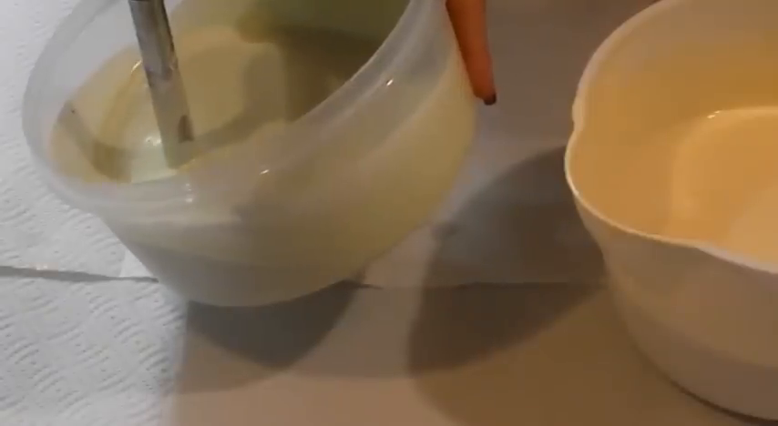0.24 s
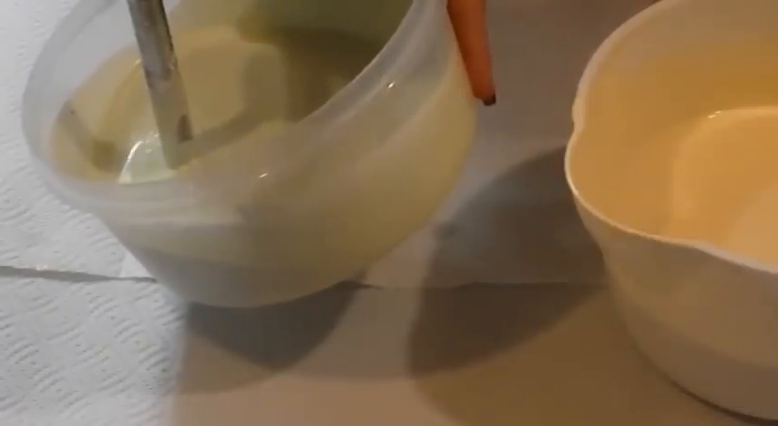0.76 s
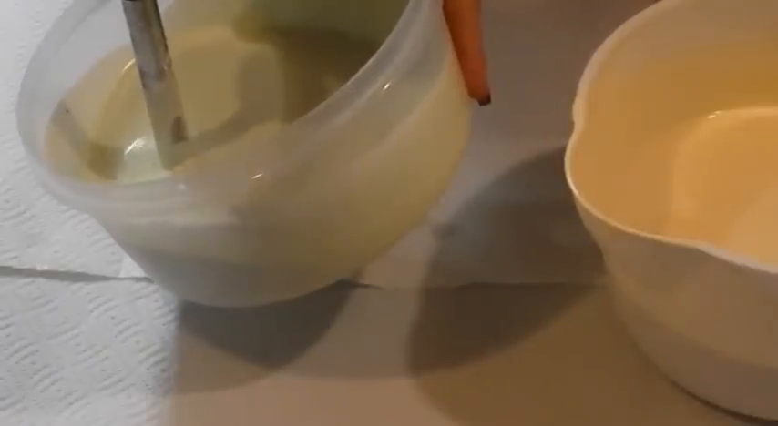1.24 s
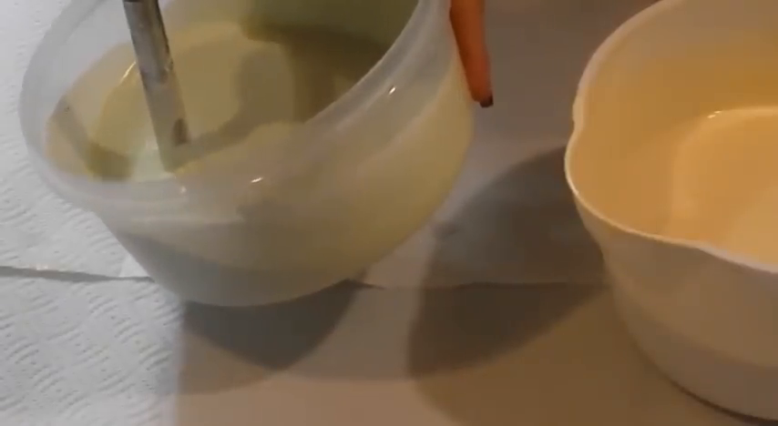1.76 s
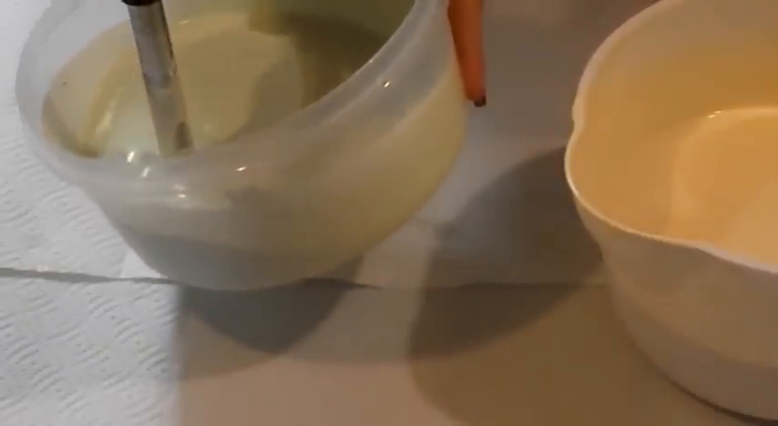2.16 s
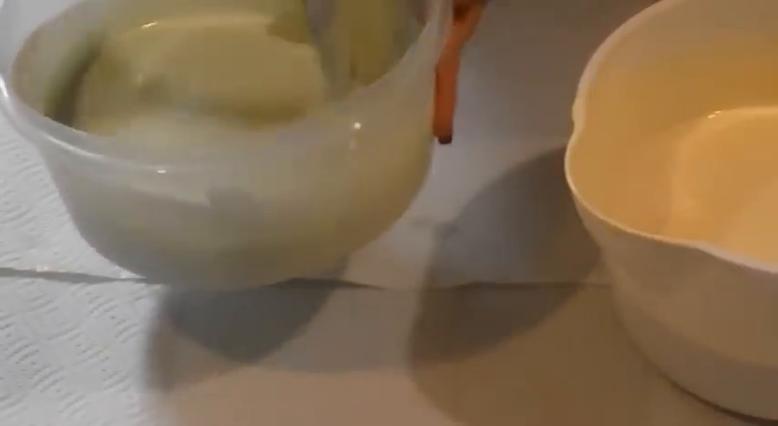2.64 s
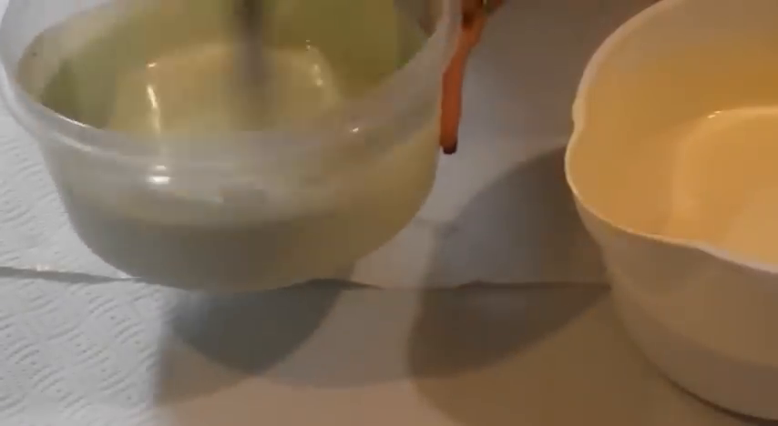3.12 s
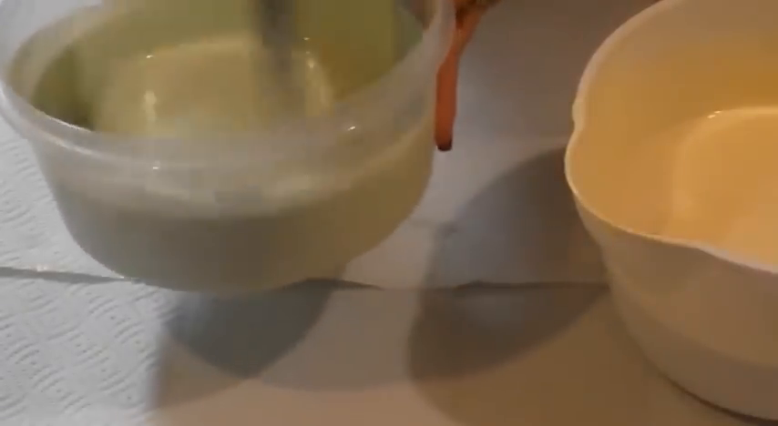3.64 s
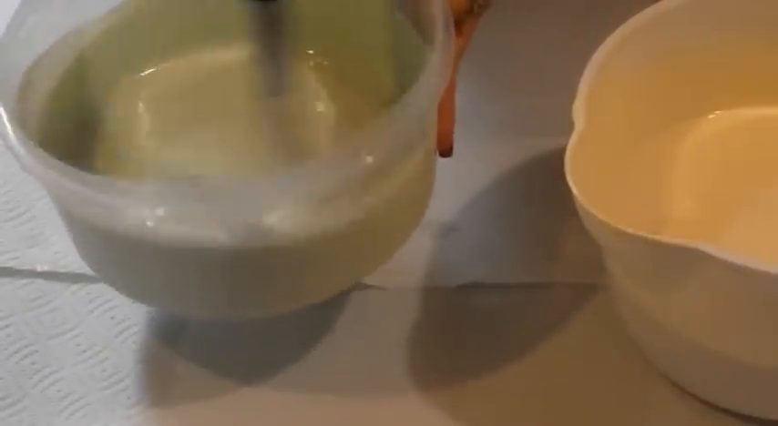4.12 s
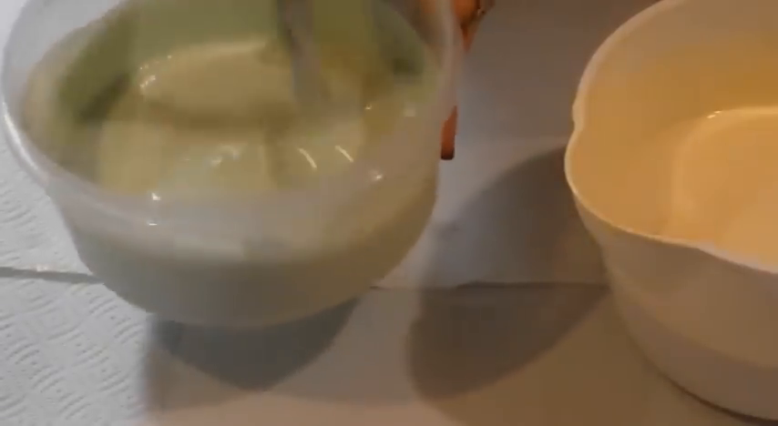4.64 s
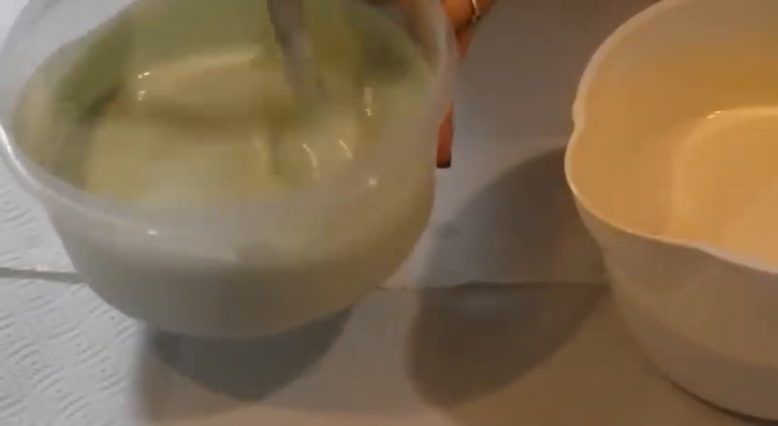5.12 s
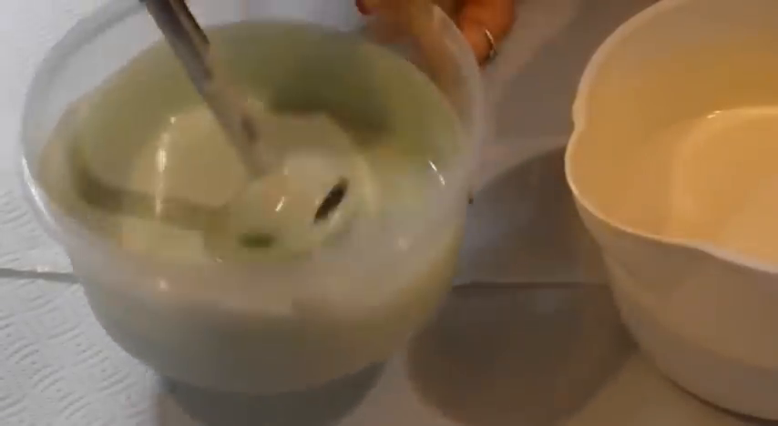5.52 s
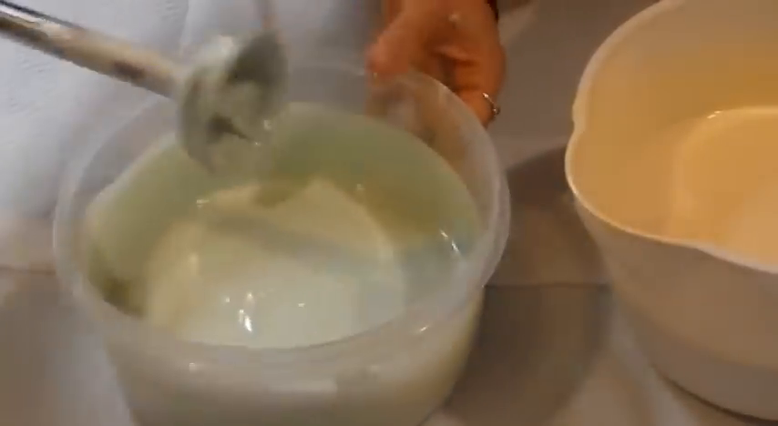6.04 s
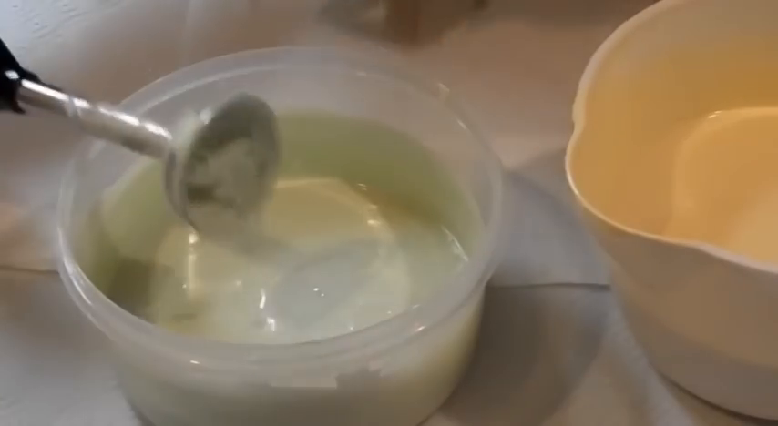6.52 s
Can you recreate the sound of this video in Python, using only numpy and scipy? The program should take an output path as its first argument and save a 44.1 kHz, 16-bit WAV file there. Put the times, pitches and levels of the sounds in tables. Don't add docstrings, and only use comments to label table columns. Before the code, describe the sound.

Close up in a small quiet kitchen, a hand blender runs in a plastic tub of thick batter with a steady, rattling motor hum and thin high whine. At about two seconds it switches off, quickly falling in pitch with loose clacks. The idle shaft taps the tub now and then, the tub is set down with a soft thump, and two solid knocks land on the rim.

```python
import sys
import numpy as np
from scipy import signal
from scipy.fft import rfft, irfft
from scipy.io import wavfile

SR = 44100
rng = np.random.default_rng(int(sys.argv[2]) if len(sys.argv) > 2 else 0)


def wav_record(signal):
    frames = np.transpose(np.atleast_2d(signal))
    bounded = np.clip(frames, -1, 1)
    quanta = np.round(bounded * 32767).astype(np.int16)
    wavfile.write(sys.argv[1], SR, quanta)


def how_loud(loudness_db):
    steps = np.asarray(loudness_db, float) / 20
    return 10 ** steps


N = 299290

MAINS_HZ = 60
BARS = 24
# (t/s, turns per second/Hz, levels of orders 1, 2, 3, 4/dB)
ROTOR_TRACK = [(0.0, 182, -26.5, -16.5, -20, -11.5), (0.016, 188, -28, -16, -18, -21),
               (0.06, 186.3, -27.5, -17.5, -21.5, -13.5), (0.572, 187, -25, -17.5, -26.5, -16),
               (0.622, 188, -26, -17, -24, -15.5), (0.716, 182, -23, -16, -29, -17.5),
               (0.728, 189, -26, -17.5, -25, -15.5), (0.854, 185, -25.5, -17, -29.5, -17.5),
               (0.87, 186, -27.5, -17, -20.5, -17), (1.118, 187, -24, -17, -34.5, -17),
               (1.278, 187, -25.5, -18, -26, -19), (1.478, 187, -26, -16.5, -31, -16),
               (1.51, 187, -25.5, -15, -39, -18.5), (1.62, 187, -28, -18, -23, -17.5),
               (1.648, 185.6, -27, -16, -24, -15.5), (1.792, 189, -28.5, -20, -29, -18.5),
               (1.846, 185.6, -26, -27, -33, -20), (1.858, 185.6, -28, -24, -55, -22),
               (1.874, 181, -28.5, -27, -27, -18), (1.902, 191, -25.5, -22, -39, -20.5),
               (1.918, 172, -34, -54, -49, -19.5), (1.934, 187, -27, -34, -28.5, -20),
               (1.98, 185.6, -26, -20, -31, -21.5)]


def rms_one(x):
    return x / np.sqrt(np.mean(x ** 2) + 1e-20)


def in_time(rows, end_db=-120):
    s, *columns = np.transpose(rows)
    t = np.arange(N) / SR
    return [np.interp(t, np.r_[s, s[-1] + .05], np.r_[c, end_db]) for c in columns]


def at_hz(points, hz):
    point_hz, point_db = np.transpose(points)
    return np.interp(np.log(hz), np.log(point_hz), point_db)


def drift(rate_hz):
    r = np.exp(-80 * np.pi * rate_hz / SR)
    slow = signal.lfilter([1], [1, -2 * r, r * r], rng.standard_normal(N // 40 + 2002))[2000:]
    return np.interp(np.arange(N) / 40, np.arange(len(slow)), rms_one(slow - slow.mean()))


def ring(drive, hz, t60):
    r, w = how_loud(-60 / (t60 * SR)), 2 * np.pi * hz / SR
    return signal.lfilter([0, np.sin(w)], [1, -2 * r * np.cos(w), r * r], drive + 1e-18)


def band(x, low_hz, high_hz, order=2):
    edges_hz = [low_hz, min(high_hz, .45 * SR)]
    return signal.sosfilt(signal.butter(order, edges_hz, "band", fs=SR, output="sos"), x)


def coloured(spectrum):
    hz = np.maximum(np.fft.rfftfreq(N, 1 / SR), 1)
    return rms_one(irfft(rfft(rng.standard_normal(N)) * how_loud(at_hz(spectrum, hz)), N))


def clicks_at(times, sizes):
    out = np.zeros(N)
    out[np.round(np.array(times) * SR).astype(int)] = sizes
    return out


def room_tone():
    # (f/Hz, level/dB)
    floor_spectrum = [(8.8, -34.5), (15, 5), (26, 1.5), (38, -22), (103, -32), (134, -42.5), (312, -39),
                      (497, -51), (543, -43), (1460, -44), (3220, -49.5), (4310, -47.5), (16000, -51)]
    # (t/s, level/dB)
    air_levels = [(0.0, -54), (0.32, -57), (0.56, -45.5), (1.04, -60.5), (1.42, -43), (1.66, -50.5),
                  (2.06, -63), (2.46, -64.5), (2.72, -61.5), (3.23, -58.5), (4.16, -58.5), (4.37, -53.5),
                  (4.74, -61), (5.07, -54), (5.48, -60.5), (5.74, -60.5), (5.95, -55), (6.03, -49),
                  (6.18, -51), (6.39, -59.5), (6.46, -41), (6.62, -33), (6.67, -40), (6.79, -29)]
    lumps = rms_one(band(rng.standard_normal(N), 7.1, 70) * how_loud(4.0 * drift(5)))
    return how_loud(-51) * coloured(floor_spectrum) + how_loud(in_time(air_levels)[0] - 5.5) * lumps


def worktop():
    # (t/s, peak level/dB)
    thumps = [
        (4.401, -41),
        (4.858, -40),
        (5.807, -27.5),
        (5.889, -40),
        (5.978, -37.5),
        (6.047, -35),
        (6.389, -52),
        (6.452, -8.5),
        (6.721, -6.5),
    ]
    # (f/Hz, level/dB, t60/s)
    slab_modes = [(59, 6, 0.24), (47, -14.5, .3), (150, -6, 0.18), (225, -18, .12)]
    s, db = np.transpose(thumps)
    push = signal.lfilter([.03], [1, -.97], clicks_at(s, how_loud(db)))
    return -sum(how_loud(level_db - 7.0) * ring(push, hz, t60) for hz, level_db, t60 in slab_modes)


def ticks():
    # (t/s, peak level/dB, f/Hz, band width/octaves)
    tick_events = [(.149, -25, 4430, .2), (2.886, -57.5, 1400, .6), (3.015, -52, 8770, .3),
                   (3.176, -45, 4880, .2), (3.209, -58.5, 11200, .25), (3.258, -59, 1806, .8),
                   (3.368, -55.5, 1430, .3), (4.345, -47, 3360, .3), (4.668, -51, 7350, .15),
                   (4.767, -39.5, 8600, .2), (4.80, -61, 1367, .3), (4.822, -60, 1360, .3),
                   (5.102, -60.5, 3930, .15), (5.773, -34.5, 8280, .3), (5.917, -41, 6000, .2),
                   (5.917, -50, 3780, .15), (5.917, -46, 8800, .2), (6.356, -37.5, 7550, .15),
                   (6.53, -20, 11100, .8), (6.529, -37, 7000, .15), (6.528, -45, 3860, .15),
                   (6.559, -34, 11400, .5), (6.634, -55, 10000, 1.0), (6.685, -54, 8970, 1.0),
                   (6.703, -40, 8800, 1.0), (6.742, -40, 11000, .6), (6.759, -37, 9900, 1.0),
                   (6.776, -33, 10900, .8)]
    out, t = np.zeros(N), np.arange(int(.08 * SR)) / SR
    for s, db, hz, octaves in tick_events:
        burst = rng.standard_normal(len(t)) * (np.exp(-t / .0012) + .06 * np.exp(-t / .012))
        burst = band(burst, hz * 2 ** (-octaves / 2), hz * 2 ** (octaves / 2), order=3)
        at = round((s - .001) * SR)
        out[at:at + len(t)] += (how_loud(db) * burst / np.abs(burst).max())[:N - at]
    return out


def taps():
    # (t/s, peak level/dB, levels of lows, mids, highs, top/dB)
    tap_events = [(2.956, -35, -60, -35.5, -69, -72), (3.169, -32.5, -60, -43, -52.5, -62),
                  (3.498, -22.5, -45, -32.5, -37.5, -52), (3.976, -25.5, -51.5, -35.5, -41.5, -69),
                  (4.171, -52, -51.5, -53, -91, -70), (4.251, -46, -66, -52.5, -76, -74),
                  (4.4, -27, -41.5, -29, -32, -39), (4.86, -18.5, -39.5, -28.5, -29, -51),
                  (5.159, -25, -42.5, -32, -42, -93), (5.184, -34, -48, -41.5, -57, -77),
                  (6.208, -18.5, -71, -51.5, -31.5, -36), (6.447, -12, -24.5, -17, -22, -33.5),
                  (6.715, -7.5, -10, -13, -19.5, -23.5)]
    colour_hz = [250, 1100, 3800, 9500]
    # (f/Hz, level/dB, t60/s)
    tub_modes = [(135, 2.5, 0.097), (231, 2.5, 0.15), (651, -3.5, 0.18), (859.5, -7.5, 0.14),
                 (1136, -11, 0.092), (1424.5, 2, 0.079), (1798, -4.5, 0.067), (2048, -6, 0.14),
                 (2570, -5.5, 0.11), (3485, -10, 0.076), (4300, -5.5, .05), (4460, -8.5, 0.045),
                 (5160, -4, .07), (5740, -3.5, 0.056), (7380, -19, .05)]
    # (f/Hz, t60/s)
    tail_decay = [(150, .25), (600, 0.26), (2000, 0.11), (6000, 0.12), (14000, .07)]
    out, span, lead = np.zeros(N), int(.3 * SR), int(.005 * SR)
    t = np.maximum(np.arange(span) - lead, 0) / SR
    after = np.arange(span) >= lead
    click = 1. * (np.arange(span) == lead)
    cut = how_loud(-900 * t ** 2 / 0.25)
    edges = 100 * 2 ** np.arange(0, 7.1, 1 / 3)
    for s, _, *colour_db in tap_events:
        colour = np.c_[colour_hz, colour_db]
        hit = np.zeros(span)
        for hz, db, t60 in tub_modes:
            mode_db = at_hz(colour, hz) + db - 2.0 + 4.0 * rng.standard_normal()
            mode_hz = hz * (1 + 0.039 * rng.standard_normal())
            hit += how_loud(mode_db) * ring(click, mode_hz, 0.53 * t60)
        white = rng.standard_normal((2, span))
        for k, (low, high) in enumerate(zip(edges, edges[1:])):
            hz = np.sqrt(low * high)
            crack = how_loud(-1.5 - 60 * t / 0.0094)
            tail = how_loud(-14.5 - 60 * t / at_hz(tail_decay, hz)) * (1 - np.exp(-t / .004))
            shape = np.where(after, crack + tail, how_loud(-27))
            band_db = at_hz(colour, hz) + 1.6 * rng.standard_normal()
            hit += how_loud(band_db) * rms_one(band(white[k % 2], low, high)) * shape
        at = round((s + 0.00065) * SR) - lead
        out[at:at + span] += (hit * cut)[:N - at]
    return out


def slaps():
    # (t/s, peak level/dB, f/Hz)
    slap_events = [(2.099, -14.5, 1268), (2.134, -17, 1354), (2.164, -15.5, 1405), (2.214, -13, 1310),
                   (2.244, -24.5, 1310), (2.266, -24.5, 1366), (2.279, -25.5, 1310), (2.301, -18.5, 1389),
                   (2.32, -20.5, 1493), (2.371, -28.5, 1350), (2.386, -30, 1333), (2.716, -38.5, 2790)]
    out = 0
    for s, db, hz in slap_events:
        click = clicks_at([s], how_loud(db))
        bell = ring(ring(click, hz, 23.0 / hz), 1.06 * hz, 13.5 / hz)
        out = out + bell * 1.36 * hz / SR + how_loud(-20) * ring(click, 800, .03)
    return out


def brushes(turns, per_s):
    # (t/s, hiss/dB, mains whine/dB, commutator bars/dB, dry rubbing/dB)
    brush_levels = [(0, -46.5, -36.5, -61, -70), (.6, -46.5, -35.5, -64, -69.5),
                    (1.2, -46, -37.5, -59, -67.5), (1.7, -45, -43.5, -63, -65.5),
                    (1.98, -46, -45.5, -62, -68), (2.01, -45.5, -63, -45, -65.5),
                    (2.1, -48.5, -90, -36.5, -58.5), (2.2, -52, -107, -50, -61.5),
                    (2.3, -60, -93, -51.5, -55), (2.4, -60.5, -95, -52.5, -54.5),
                    (2.5, -57, -90, -49.5, -58), (2.6, -73, -90, -47, -53), (2.7, -68, -90, -66, -53.5),
                    (2.76, -71, -89, -79, -59), (2.84, -80, -90, -93, -75), (3.0, -86.5, -90, -95, -71),
                    (3.18, -90, -89, -94.5, -69), (3.24, -94, -89, -95, -88)]
    # (f/Hz, density/dB)
    hiss_spectrum = [(1500, -27), (2600, -6.5), (4000, -6.5), (5650, -11), (8260, -17.5), (9000, -10),
                     (10300, -22.5), (12100, -27), (13400, -21), (14200, -36.5), (16000, -41.5)]
    # (f/Hz, gain/dB)
    housing_gain = [(2500, -14), (4500, -14.5), (5300, 2), (6500, -5), (8700, 2), (10500, -11),
                    (12000, 6.5), (13000, -6), (14000, 7.5), (15500, -7.5), (16500, -18)]
    # (f/Hz, width/Hz, level/dB)
    shell_modes = [(2530, 85, -12), (2980, 92, -6.5), (3370, 84, -9), (4490, 72, -10), (5170, 160, -1),
                   (5400, 98, -3), (6300, 180, -7.5), (7550, 58, -10.5), (8730, 180, -5),
                   (9500, 130, -11.5), (10200, 140, -14.5), (10400, 38, -12), (10900, 29, -11),
                   (11800, 270, -20)]
    hiss_db, whine_db, bars_db, rub_db = in_time(brush_levels)
    t = np.arange(N) / SR
    hiss = coloured(hiss_spectrum) * how_loud(hiss_db + 1.0 + 1.2 * drift(40))

    white = rng.standard_normal(N)
    rub = rms_one(sum(how_loud(db) * rms_one(ring(white, hz, 2.2 / width)) for hz, width, db in shell_modes))

    wobble = turns + 0.0013 * np.sin(2 * np.pi * turns)
    bars = 0
    for k in range(3, 11):
        hz = k * BARS * per_s
        level = how_loud(at_hz(housing_gain, hz) - 1.6 * k + 4.8 * drift(30)) * (hz < 16200)
        bars = bars + level * np.sin(2 * np.pi * k * BARS * wobble)

    whine_hz = 9020.3
    swing = np.sin(np.pi * MAINS_HZ * (t - .0055))
    carrier = np.sin(2 * np.pi * whine_hz * t + .5 * drift(20))
    whine = np.tanh(2.2 * swing) * how_loud(2.0 * drift(4.6)) * carrier
    beating = np.cos(2 * np.pi * MAINS_HZ * t + 0.55 * swing)
    whine += .25 * beating * np.sin(2 * np.pi * (whine_hz - 150) * t + 0.73 * drift(11))
    bar_tone = np.sin(2 * np.pi * 2 * BARS * turns + .5 * drift(20))
    whine += .55 * np.abs(swing) ** 3.0 * bar_tone
    return hiss + how_loud(rub_db) * rub + how_loud(bars_db + 4.0) * bars + how_loud(whine_db + 5.0) * whine


def chatter(turns):
    # (t/s, levels of tub wall, bell, shaft, neck/dB)
    chatter_levels = [(0.0, -16, -17, -17.5, -25), (0.02, -24, -20.5, -31, -21.5),
                      (0.11, -21.5, -21, -22.5, -26.5), (0.28, -20, -22.5, -23.5, -24.5),
                      (0.44, -19.5, -24, -28, -28.5), (0.51, -19.5, -21.5, -24, -42.5),
                      (0.54, -26.5, -19.5, -25.5, -29), (0.62, -20.5, -20.5, -28.5, -38),
                      (0.74, -22, -20.5, -25.5, -41), (0.76, -21.5, -21.5, -35.5, -53),
                      (0.8, -21, -24, -25.5, -42), (0.85, -22, -22.5, -30.5, -46),
                      (1.07, -22, -19.5, -24.5, -44.5), (1.35, -21.5, -19.5, -42, -47),
                      (1.4, -24.5, -12.5, -39, -45.5), (1.5, -20.5, -23.5, -32, -44),
                      (1.52, -29.5, -16, -34, -44), (1.58, -21, -25, -40, -43),
                      (1.62, -23.5, -23, -29.5, -44.5), (1.79, -25, -27.5, -38, -46),
                      (1.83, -22, -21.5, -43, -45), (1.91, -28, -18, -39, -43.5),
                      (1.99, -24, -27.5, -43, -44.5), (2.05, -27, -18, -56, -46.5),
                      (2.28, -48, -41, -56, -58.5), (2.32, -54, -37, -51, -49), (2.45, -64, -81, -68, -71),
                      (2.83, -73, -95, -80, -80), (2.94, -84, -64.5, -82, -97), (2.95, -85, -73, -71, -68)]
    # (low f/Hz, high f/Hz)
    chatter_bands = [(610, 1200), (1230, 1524), (1570, 1790), (1830, 2560)]
    # (f/Hz, width/Hz, level/dB)
    body_modes = [(670, 70, -6.5), (860, 90, -0.5), (1310, 60, 0.5), (1400, 80, 4.5), (1646, 40, -0.5),
                  (2385, 110, -3.5)]
    beat = np.diff(np.floor(turns + .06 * drift(150)), prepend=0) > 0
    knocks = rms_one(beat * how_loud(4.0 * rng.standard_normal(N)))
    drive = 0.48 * knocks + rng.standard_normal(N) * how_loud(1.1 * drift(60))
    drive = drive + sum(how_loud(db) * ring(drive, hz, 1.9 / width) * np.pi * width / SR * 2
                        for hz, width, db in body_modes)
    levels = in_time(chatter_levels)
    out = how_loud(levels[0] - 11.5) * rms_one(band(drive, 300, 610))
    for db, (low, high) in zip(levels, chatter_bands):
        out = out + how_loud(db + 1.5 * drift(20)) * rms_one(band(drive, low, high, order=4))
    return out


def speed():
    start_s, tau_s, friction_per_s = 1.9685, .46, 20.6
    t = np.arange(N) / SR
    steady = in_time(ROTOR_TRACK, end_db=ROTOR_TRACK[-1][1])[0]
    coast = (steady + friction_per_s) * np.exp(-(t - start_s) / tau_s) - friction_per_s
    coast += 6.5 * np.exp(-np.abs(t - 2.0) / 0.043)
    return np.clip(coast, 1, steady), steady


def rotor(turns, per_s, steady):
    # (multiple of turn rate, level/dB)
    upper_orders = [(5, -33), (6, -33), (8, -33)]
    # (f/Hz, gain/dB)
    tub_gain = [(60, -13), (120, -7.5), (186, -2), (250, -6), (310, 6), (372, 0.5), (440, 12), (560, -1.5),
                (650, 9), (745, 3), (1000, 3), (1500, 6.5)]
    t = np.arange(N) / SR
    ripple = 1 + .2 * np.sin(2 * np.pi * MAINS_HZ * t)
    s, _, *order_db = np.transpose(ROTOR_TRACK)
    orders = [(k, np.interp(t, s, db)) for k, db in enumerate(order_db, 1)] + upper_orders
    out = 0
    for k, db in orders:
        k = round(k)
        sweep_db = at_hz(tub_gain, k * per_s) - at_hz(tub_gain, k * steady)
        sweep_db = sweep_db + 65 * np.log10(per_s / steady)
        phase = 2 * np.pi * k * turns + .08 * drift(23) + rng.uniform(0, 6)
        level = np.sqrt(2) * how_loud(db + sweep_db + 0.581 * drift(25))
        out = out + level * np.sin(phase) * (ripple if k == 4 else 1)
    return out


def scene():
    per_s, steady = speed()
    turns = np.cumsum(per_s) / SR
    motor = rotor(turns, per_s, steady) + chatter(turns) + brushes(turns, per_s) + slaps()
    return (motor + taps() + ticks() + worktop() + room_tone())[None]


def roll_off(x):
    return signal.sosfilt(signal.butter(12, 16470, fs=SR, output="sos"), x)


def record(dry):
    cut = signal.sosfilt(signal.butter(10, 15800, fs=SR, output="sos"), dry)
    return roll_off(1.507 * np.tanh(cut / 1.584))


dry = scene()
out = record(dry)
wav_record(out)
```